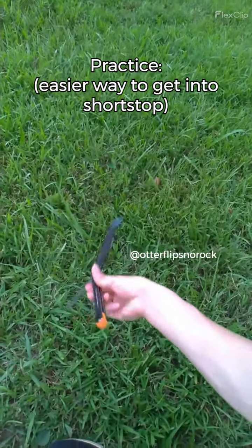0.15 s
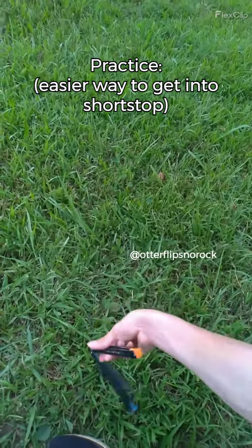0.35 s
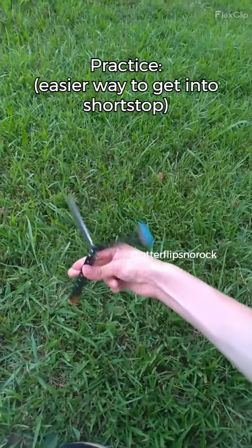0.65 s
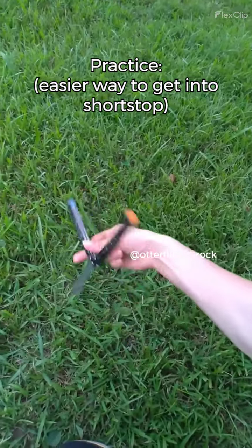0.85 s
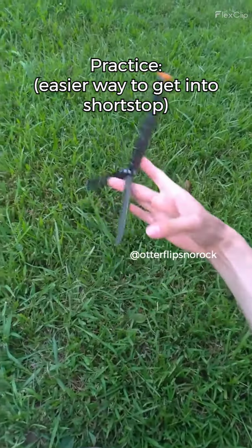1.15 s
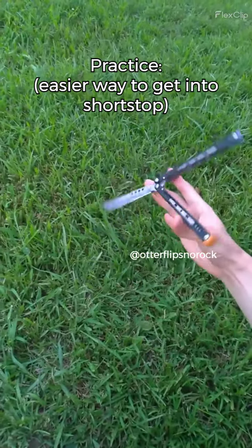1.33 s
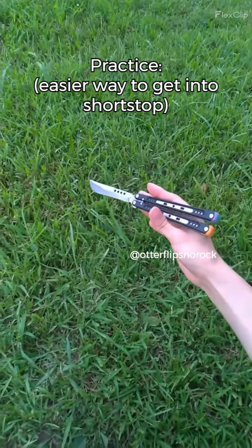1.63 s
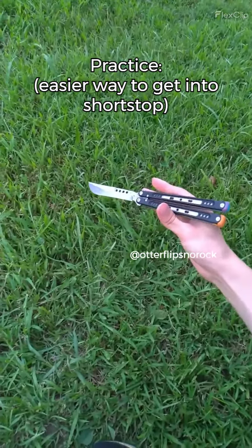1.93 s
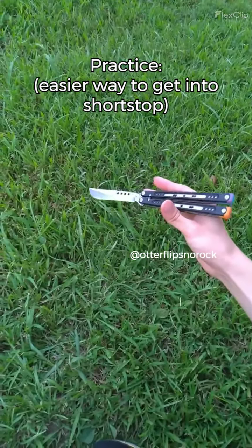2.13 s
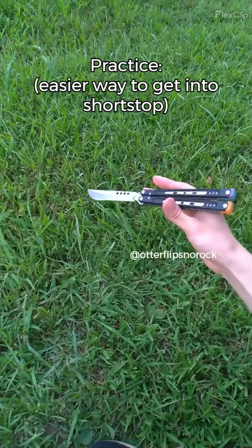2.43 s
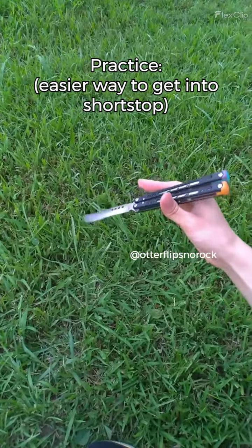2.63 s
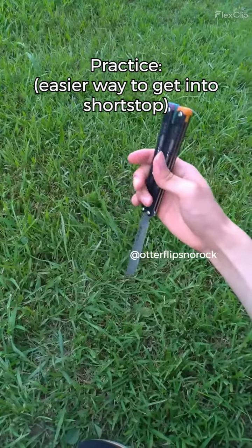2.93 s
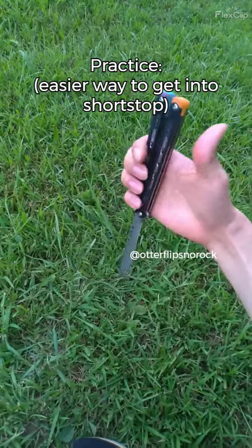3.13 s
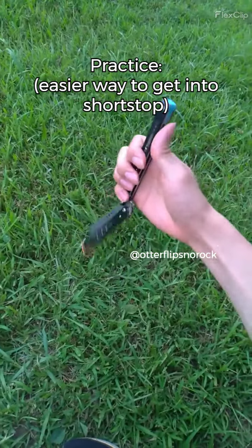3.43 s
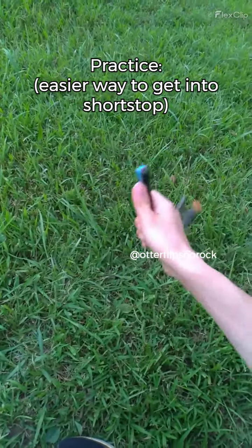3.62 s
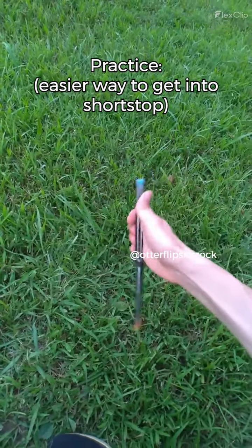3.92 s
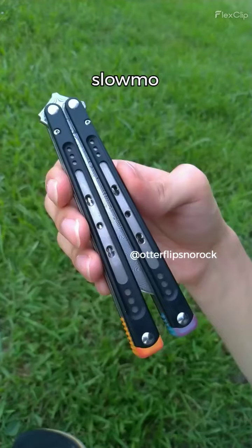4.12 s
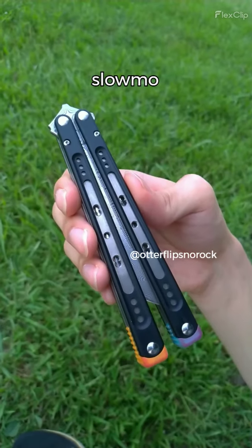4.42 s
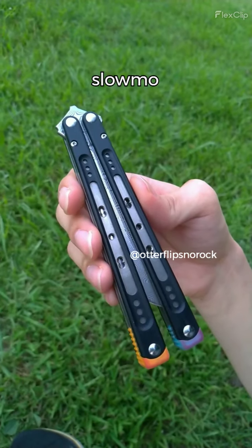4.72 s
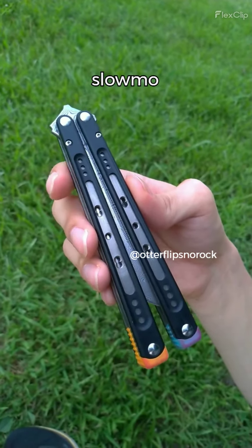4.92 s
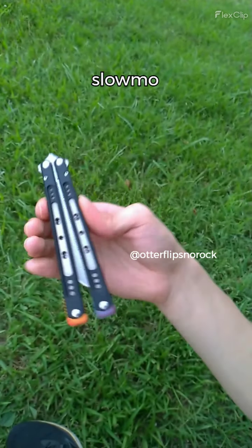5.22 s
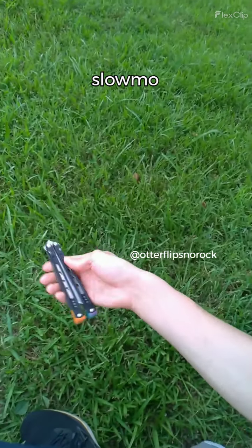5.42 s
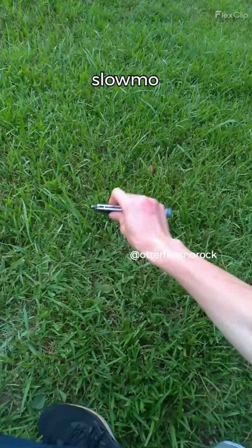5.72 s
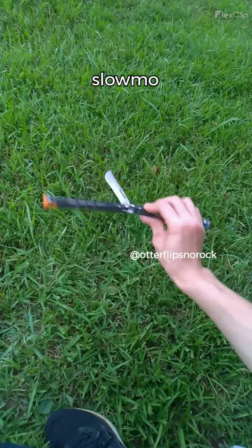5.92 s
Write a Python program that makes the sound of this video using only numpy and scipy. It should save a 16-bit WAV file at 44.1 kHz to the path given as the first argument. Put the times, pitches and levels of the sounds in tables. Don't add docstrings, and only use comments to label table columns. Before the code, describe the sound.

Outdoors, steel handles click and rattle close to the microphone in quick, briefly ringing bursts, over a wavering low engine drone, soft tyre hiss and a bright narrow insect chorus. Songbird whistles join near three seconds. After the last clacks the sound stops abruptly, stays silent for a moment, then a muffled, noise-reduced second ambience fades up, with traffic, softer insects and scattered bird notes.

```python
import sys
import numpy as np
from scipy import signal
from scipy.fft import rfft, irfft, next_fast_len
from scipy.io import wavfile
from scipy.ndimage import uniform_filter1d, map_coordinates

SR = 44100
rng = np.random.default_rng(int(sys.argv[2]) if len(sys.argv) > 2 else 0)


def ratio_of_db(decibels):
    return 10 ** (np.asarray(decibels, float) / 20)


def file_out(sig):
    cols = np.atleast_2d(sig).T
    lim = np.clip(cols, -1, 1)
    pcm = np.round(lim * 32767).astype(np.int16)
    wavfile.write(sys.argv[1], SR, pcm)


N = 267157
TIME = np.arange(N) / SR
CUT, RESUME = 4.0505, 4.172
IN_FIRST = TIME < RESUME - .05


def unit(x):
    return x / np.sqrt(np.mean(x ** 2) + 1e-20)


def along(points, hz):
    f, v = np.transpose(points)
    return np.interp(np.log(hz + 1), np.log(f + 1), v)


def wobble(rate):
    knots = rng.standard_normal(int(N * rate / SR) + 4)
    return map_coordinates(knots, [TIME * rate])


def filtered(x, response):
    m = next_fast_len(N + 8192)
    gain = response(np.fft.rfftfreq(m, 1 / SR))
    return irfft(rfft(x, m) * gain, m)[..., :N]


def ring(modes, t, spread_db, damping):
    hz, db, t60 = np.transpose(modes)[:, :, None, None]
    shape = (len(modes), 2, 1)
    hz = hz * (1 + 0.017 * rng.standard_normal((len(modes), 1, 1)))
    decay_db = 60 * damping * t / t60
    level = ratio_of_db(db + spread_db * rng.standard_normal(shape) - decay_db)
    out = (level * np.sin(2 * np.pi * (hz * t + rng.random(shape)))).sum(axis=0)
    return out * (1 - np.exp(-t / 0.00031))


# pitch as a ratio to the knock, level in dB, t60 in seconds.
HANDLE_MODES = [(.86, -5, .012), (1, 0, .018), (1.15, -4, .012)]
# pitch in Hz, level in dB, t60 in seconds.
STEEL_MODES = [(5210, -3, 0.014), (5640, -2.5, 0.023), (6020, -4, 0.01), (6390, -4.5, 0.025),
               (7000, -5, 0.014), (7560, -4.5, 0.013), (8120, -3.5, 0.014), (8570, -2.5, 0.014),
               (8860, 2.5, 0.011), (9670, 1.5, 0.0091), (10400, -3, 0.0067), (10730, 0, 0.0092),
               (11100, -3.5, 0.018)]
BLADE_MODES = [(12630, -2.5, 0.015), (13600, -12, .011), (13200, 4.5, 0.0084), (14900, -15, 0.0069),
               (15300, -11, .01)]
PIN_MODES = [(3450, -2, 0.02), (3780, -4, 0.027), (4300, 1, 0.012), (4470, 2, 0.012)]
# start in seconds, peak in dB, handle knock in dB, knock pitch in Hz,
# pitch favoured by the spot struck in Hz.
HANDLE_CLACKS = [(0.3562, -33.5, -2.5, 1970, 7000), (0.606, -47.5, -6, 1950, 7000),
                 (0.8849, -38.5, 4, 2150, 7500), (0.9207, -31, -13, 2460, 5100),
                 (1.0578, -26.5, -3, 2000, 9010), (1.381, -42, -17, 2200, 8400),
                 (1.3866, -31.5, 4, 2310, 8500), (1.4728, -31.5, -4.5, 2447, 6500),
                 (1.5015, -32.5, -1, 2560, 7000), (1.5105, -24.5, -6.5, 2500, 7500),
                 (1.514, -28, -11, 2570, 10500), (2.626, -50, 2, 2800, 5020), (3.496, -27, -10, 2090, 5200),
                 (3.652, -31, 2, 1956, 4970), (3.8396, -25, -8, 2450, 6100),
                 (3.8726, -28.5, -1.5, 2250, 4620), (3.8931, -30, -6.5, 2233, 4020),
                 (3.9863, -24.5, -11.5, 2230, 7200)]


def clacks():
    pin_db, off_spot_db_per_octave, blade_db, hand_pan_db = -1.5, 8.5, -13.5, -3
    out = np.zeros((2, N + SR))
    t = np.arange(SR // 20) / SR
    ms = np.arange(SR // 50) / SR * 1000
    shape = np.minimum(ms / 2.7, 1) ** 0.74 * ratio_of_db(-4.4 * np.maximum(ms - 2.4, 0))
    pan = ratio_of_db(np.array([[.5], [-.5]]) * hand_pan_db)
    struck = STEEL_MODES + [(hz, d + pin_db, t60) for hz, d, t60 in PIN_MODES]
    for start, db, knock_db, knock_hz, spot_hz in HANDLE_CLACKS:
        blows = shape * (rng.random(len(ms)) < .07) * rng.standard_normal(len(ms))
        blows += 2.23 * np.sinc((ms - 2.4) * SR / 1000)
        metal = [(hz, d - off_spot_db_per_octave * abs(np.log2(hz / spot_hz)), t60) for hz, d, t60 in struck]
        handle = np.multiply(HANDLE_MODES, [knock_hz, 1, 1])
        clack = 0
        for modes, part_db in [(metal, 0), (handle, knock_db), (BLADE_MODES, blade_db)]:
            struck_once = ring(modes, t, spread_db=1.5, damping=1.8)
            rung = signal.fftconvolve(struck_once, blows[None], axes=1)
            clack = clack + ratio_of_db(part_db) * rung / abs(rung).max()
        crack = np.diff(rng.standard_normal((2, len(ms) + 1)))
        clack[:, :len(ms)] += ratio_of_db(-9.5) * shape * crack
        k = round((start - .001) * SR)
        out[:, k:][:, :clack.shape[1]] += ratio_of_db(db + 5.5) * pan * clack
    return out[:, :N]


# start in seconds, length in seconds, level in dB, contacts per second.
PIN_JINGLES = [
    (0.857, 0.085, -54.5, 1200),
    (1.45, 0.12, -62, 1400),
    (3.629, 0.073, -53, 1400),
    (3.864, 0.077, -49, 1800),
    (3.97, 0.045, -53.5, 1440),
]


def jingles():
    out = np.zeros((2, N + SR))
    t = np.arange(SR // 20) / SR
    for start, length, db, rate in PIN_JINGLES:
        n = int(length * SR)
        ticks = (rng.random(n) < rate / SR) * rng.standard_normal(n) * np.hanning(n)
        struck_once = ring(PIN_MODES + STEEL_MODES + BLADE_MODES, t, spread_db=3.5, damping=2.1)
        pins = signal.fftconvolve(struck_once, ticks[None], axes=1)
        k = round(start * SR)
        out[:, k:][:, :pins.shape[1]] += ratio_of_db(db) * pins / np.std(pins[:, :n])
    return out[:, :N]


# start in seconds, length in seconds, first pitch in Hz, last pitch in Hz, level in dB.
CLEAR_NOTES = [
    (3.087, .02, 3450, 2514, -52),
    (3.106, 0.0752, 2450, 2140, -60),
    (3.187, 0.16, 2744, 2466, -57),
    (3.288, .03, 4300, 3060, -65),
    (3.599, 0.088, 4500, 4770, -65),
    (3.668, .025, 7200, 7090, -64.5),
    (5.044, .135, 2790, 2493, -58),
    (5.752, .025, 7700, 7000, -66),
]
HUSKY_NOTES = [
    (2.995, 0.13, 3710, 3730, -62.5),
    (3.001, 0.096, 7440, 7550, -64),
    (3.383, 0.071, 1930, 1830, -60.5),
    (3.66, .035, 3730, 3450, -62),
    (4.641, .09, 2860, 2350, -58),
    (5.688, .075, 4790, 4930, -67.5),
    (5.776, .085, 6900, 6200, -71.5),
    (5.847, .1, 2789, 2250, -57),
    (5.747, .025, 4444, 3840, -61.5),
]
BUZZY_NOTES = [
    (0.752, 0.2, 3780, 3380, -63.5),
    (2.993, 0.1, 4200, 4500, -59.5),
    (4.284, .08, 3826, 3399, -59.5),
    (4.529, .11, 3450, 2950, -62.5),
    (5.792, .065, 3400, 3070, -61.5),
]


def bird():
    husk_hz, buzz_hz, sweeps_per_s = 120, 282, 75
    glide_share, loudest_share = .7, 0.58
    swell_db = 9
    voice = np.zeros(N)
    waver = wobble(150)
    drift = wobble(40)
    notes = [(*row, 0) for row in CLEAR_NOTES]
    notes += [(*row, husk_hz) for row in HUSKY_NOTES]
    notes += [(*row, buzz_hz) for row in BUZZY_NOTES]
    for start, length, first_hz, last_hz, db, depth_hz in notes:
        k = round(start * SR)
        t = np.arange(k, k + round(length * SR)) / SR
        u = (t - start) / length
        glide = np.expm1(-u / glide_share) / np.expm1(-1 / glide_share)
        hz = first_hz + (last_hz - first_hz) * glide
        buzz_phase = -2 * np.pi * sweeps_per_s * t + 1.5 * drift[k:][:len(t)]
        hz += depth_hz * signal.sawtooth(buzz_phase, .85)
        hz += (25 + .3 * depth_hz) * waver[k:][:len(t)]
        phase = 2 * np.pi * np.cumsum(hz) / SR
        edge = np.clip(np.minimum(t - start, start + length - t) / 0.0029, 0, 1)
        level = ratio_of_db(db + 7.5 - swell_db * (u / loudest_share - 1) ** 2)
        voice[k:][:len(t)] += level * edge * (np.sin(phase) + ratio_of_db(-24) * np.sin(2 * phase))
    voice *= ratio_of_db(2.5 * wobble(45))
    trees = rng.standard_normal((2, SR // 4)) * ratio_of_db(-60 * TIME[:SR // 4] / 0.17)
    trees /= np.linalg.norm(trees[0])
    echo = signal.fftconvolve(voice[None], trees, axes=1)[:, :N]
    return voice * ratio_of_db([[1.5], [-1.5]]) + ratio_of_db(-2) * echo


# frequency in Hz, left-right likeness.
EAR_LIKENESS = [(60, 0.97), (150, 1), (380, 0.62), (950, 0.27), (2380, -0.058), (5980, 0.0098),
                (15000, 0.026)]


def rush(spectrum, patchy_db):
    z = signal.stft(rng.standard_normal((2, N)), nperseg=512)[2]
    patches = uniform_filter1d(rng.standard_normal(z.shape[1:]), size=6, axis=0)
    patches = uniform_filter1d(patches, size=12, axis=1)
    pair = signal.istft(z * ratio_of_db(patchy_db * unit(patches)), nperseg=512)[1][:, :N]

    def mid_side_gain(hz):
        turn = np.arccos(np.clip(along(EAR_LIKENESS, hz), -1, 1)) / 2
        return ratio_of_db(along(spectrum, hz)) * [np.cos(turn), np.sin(turn)]

    mid, side = filtered(pair, mid_side_gain)
    return np.array([mid + side, mid - side]) / np.std(mid)


def rush_by_view(spectra, patchy_db):
    return np.where(IN_FIRST, rush(spectra[0], patchy_db), rush(spectra[1], patchy_db))


# frequency in Hz, level in dB per Hz.
INSECT_COLOURS = [
    [(4820, -57), (8200, -35.5), (9190, -15.5), (9930, -3.5), (10300, 0.5), (11000, -4.5), (11900, -20.0), (15500, -48), (22000, -120)][:-2] + [(12400, -22.5), (14000, -23.0), (16000, -27)],
    [(4820, -24), (8200, -19), (8700, -19.5), (9260, 1), (9700, -4), (12600, -37.5), (21300, -120)],
]


def insects():
    level_db = np.where(IN_FIRST, -50, -62.5) - 0.1
    swell_db = 1.6 * wobble(7.5) + 0.22 * wobble(120)
    return ratio_of_db(level_db + swell_db) * rush_by_view(INSECT_COLOURS, patchy_db=1.0)


# time in seconds, pitch in Hz, level in dB.
ENGINE_PATHS = [
    [(0.0, 57.3, -27.5), (.33, 54.75, -28), (.8, 55.06, -32), (1.17, 54.5, -21.5), (1.42, 54, -32.5),
     (1.6, 58.1, -43), (1.95, 63.1, -29.5), (2.2, 56.27, -34), (2.33, 62.1, -25.5), (2.6, 60.06, -38.5),
     (2.9, 55, -31), (3.45, 65.96, -31), (3.65, 61, -36.5)],
    [(4.35, 58.96, -34), (4.85, 54, -38), (5.15, 53.4, -28.5), (5.45, 61, -33), (6.0, 53, -31)],
]


def engines():
    first, second = [np.transpose(path) for path in ENGINE_PATHS]
    hz, db = [np.where(IN_FIRST, np.interp(TIME, first[0], a), np.interp(TIME, second[0], b))
              for a, b in zip(first[1:], second[1:])]
    beat = unit(ratio_of_db(2.5 * wobble(12)))
    phase = 2 * np.pi * np.cumsum(hz + 2.47 * wobble(18)) / SR
    return np.sqrt(2) * ratio_of_db(db - 3.5) * beat * np.sin(phase)


# frequency in Hz, level in dB per Hz.
RUMBLE_COLOUR = [(15, -50), (25, -26), (30, -27.5), (39, -10), (63, -2.5), (150, -14.5), (188, -16.5),
                 (243, -20), (295, -24.5), (450, -42.5), (580, -58.5), (990, -120)]
# frequency in Hz, level in dB per Hz.
TYRE_COLOURS = [
    [(210, -9.5), (350, 1), (435, -5), (498, -2.5), (1160, -2), (1440, -6), (1560, -5.5), (1990, -10.5),
     (8180, -25.5), (9000, -21), (11700, -47), (19800, -120)],
    [(210, -13.5), (350, -6), (459, -12.5), (663, -10.5), (1380, -12.5), (1580, -16), (2100, -19),
     (5830, -33.5), (7140, -31.5), (9000, -34), (11700, -60), (19800, -120)],
]


def road():
    rumble = ratio_of_db(-37.5 + 5 + 1.02 * wobble(4.11)) * rush(RUMBLE_COLOUR, patchy_db=-0.34)
    tyre_db = np.where(IN_FIRST, -47.5, -46.5) + 1.5 + wobble(5) / 2
    return rumble + ratio_of_db(tyre_db) * rush_by_view(TYRE_COLOURS, patchy_db=1.41)


# frequency in Hz, left minus right in dB.
BED_LEAN = [(60, 1), (110, 3), (200, 0), (380, -1.5), (700, 4.5), (1290, -0.5), (2380, 3.5), (4400, -1),
            (8120, 3), (15000, 10.5)]


def scene():
    sides = np.array([[.5], [-.5]])
    bed = filtered(engines() + road() + insects(), lambda hz: ratio_of_db(along(BED_LEAN, hz) * sides))
    return clacks() + jingles() + bird() + bed


def thinned(x, need, span, moody_db):
    _, t, z = signal.stft(x, SR, "cosine", nperseg=2048)
    hz = np.arange(1025) * SR / 2048
    bands = z[:, :1024].reshape(2, 64, 16, len(t))
    level = 10 * np.log10((abs(bands) ** 2).mean(axis=(0, 2)) + 1e-20)
    usual = np.median(level[:, (t > span[0]) & (t < span[1])], axis=1, keepdims=True)
    mood = uniform_filter1d(rng.standard_normal(level.shape), size=2, axis=1)
    mood = moody_db * unit(mood + .6 * np.roll(mood, 1, axis=0))
    need_db = along(need, hz[8:1024:16])[:, None]
    faintest = ratio_of_db(usual + np.minimum(need_db, -1) + 4.5)[:, None]
    kept = (level - usual + mood > need_db)[:, None] & (abs(bands) > faintest)
    z[:, :1024] = (bands * kept).reshape(2, 1024, len(t))
    return signal.istft(z, SR, "cosine", nperseg=2048)[1][:, :N]


# frequency in Hz, gain in dB.
MICROPHONE_BASS = [(18, -22), (27, -12.5), (36, -11), (44, -1), (52, 0)]
# frequency in Hz, level over the usual one in dB.
NEEDED_LEVELS = [
    [(1500, -30), (3500, -13), (5000, -8), (6500, -6), (7800, -3), (8800, -3.5), (9600, -16), (11600, -14),
     (12000, 3), (12600, 10), (16000, 10)],
    [(1200, -30), (2500, -8), (4000, -4.5), (5000, -.5), (5600, 1.5), (6500, 0), (7500, 2), (8600, -2),
     (9100, -9)],
]
# time in seconds, level in dB.
FADE_IN = [
    (4.172, -13),
    (4.26, -5.5),
    (4.31, -2.5),
    (4.38, 0.5),
]


def two_views(dry):
    heard = filtered(dry, lambda hz: ratio_of_db(along(MICROPHONE_BASS, hz)) * (hz < 15850))
    first = thinned(heard, NEEDED_LEVELS[0], (0, CUT), moody_db=2.6)
    remnant = (TIME >= CUT) & (TIME < CUT + .0105)
    first = first * ((TIME < CUT) + ratio_of_db(-33.5) * remnant)
    dull = filtered(heard, lambda hz: hz < 9750)
    second = thinned(dull, NEEDED_LEVELS[1], (RESUME, N / SR), moody_db=3.4)
    fade_s, fade_db = np.transpose(FADE_IN)
    onset = np.clip((TIME - RESUME) / 0.0027, 0, 1)
    return first + second * ratio_of_db(np.interp(TIME, fade_s, fade_db)) * onset


def top_cut(x):
    return signal.sosfilt(signal.butter(12, 16640, fs=SR, output="sos"), x)


def record(dry):
    return top_cut(two_views(dry))


dry = scene()
out = record(dry)
file_out(out)
```